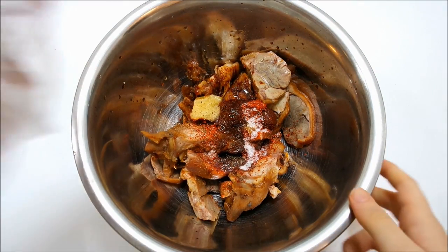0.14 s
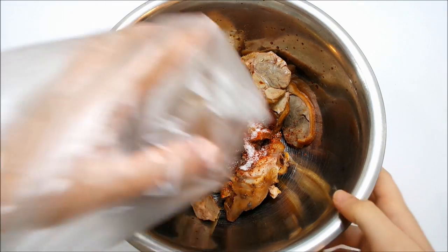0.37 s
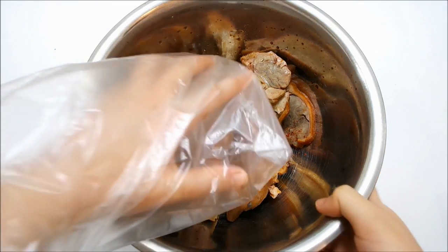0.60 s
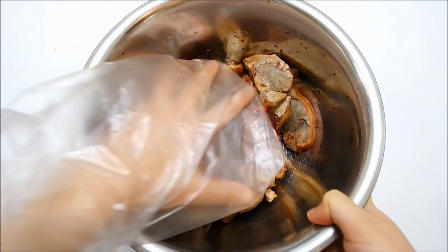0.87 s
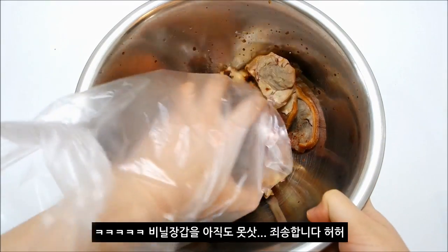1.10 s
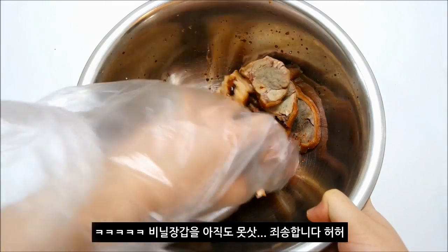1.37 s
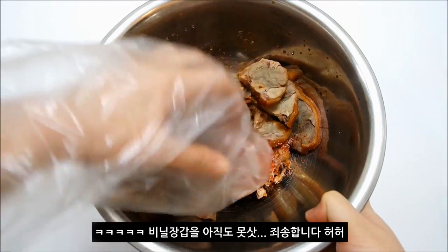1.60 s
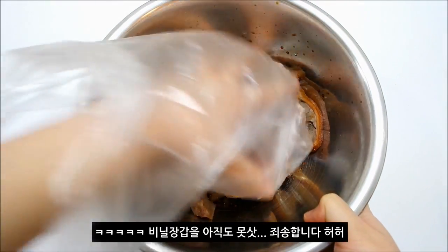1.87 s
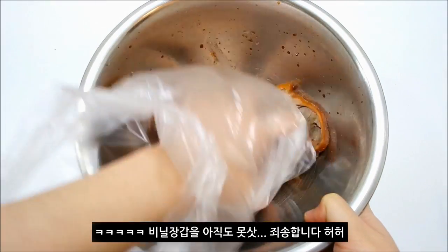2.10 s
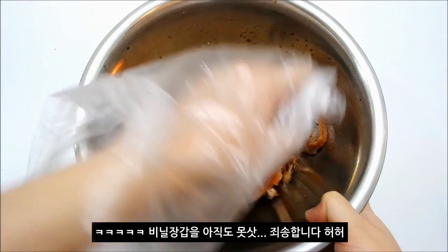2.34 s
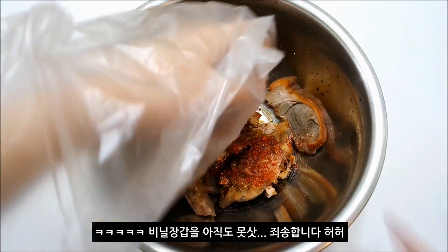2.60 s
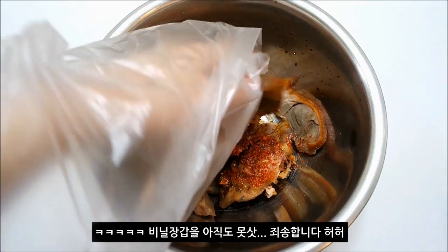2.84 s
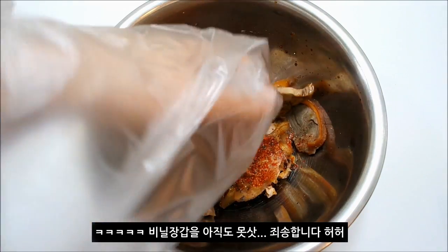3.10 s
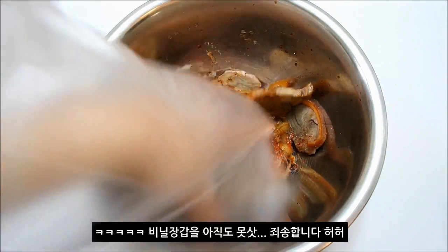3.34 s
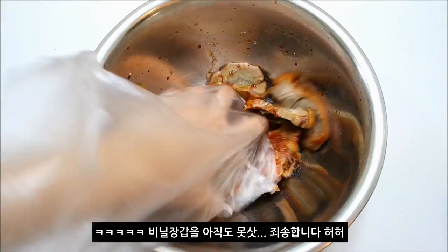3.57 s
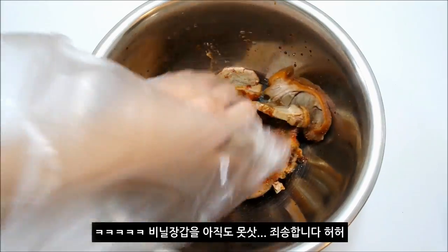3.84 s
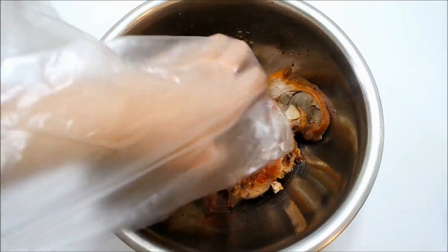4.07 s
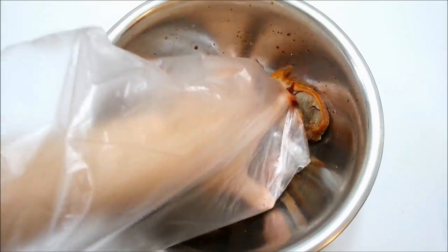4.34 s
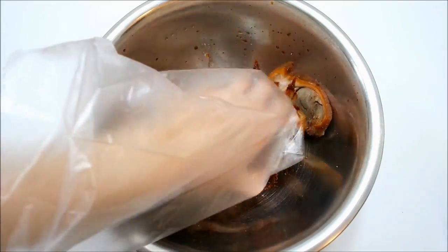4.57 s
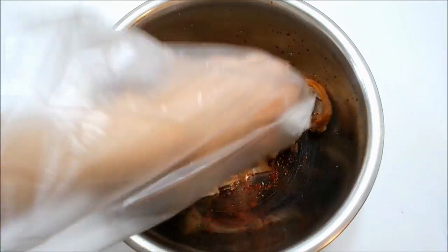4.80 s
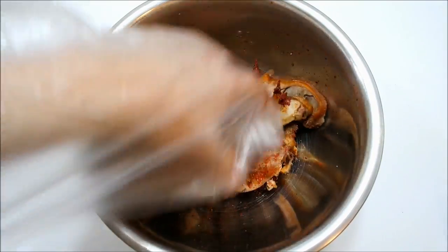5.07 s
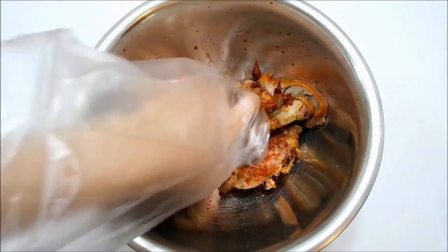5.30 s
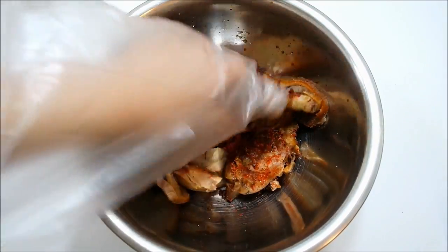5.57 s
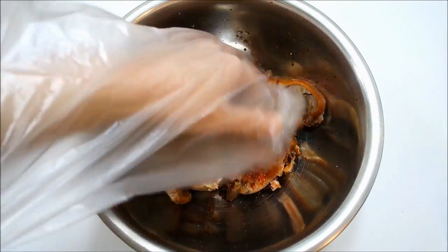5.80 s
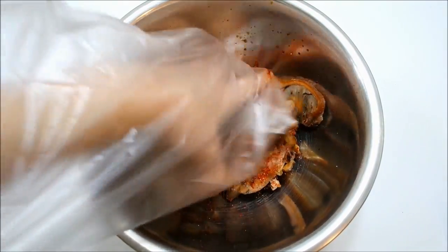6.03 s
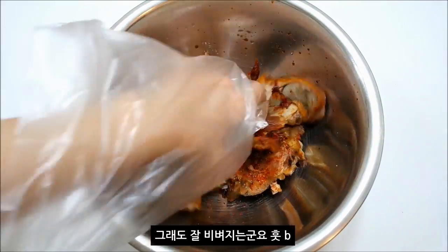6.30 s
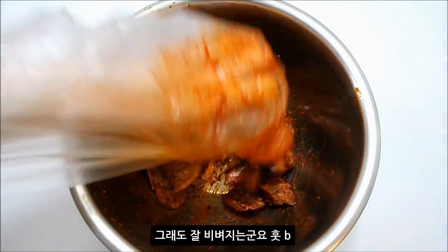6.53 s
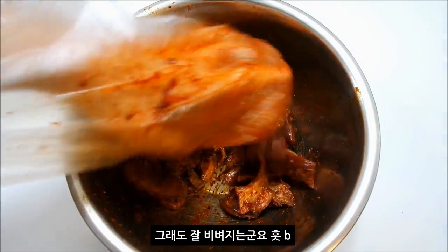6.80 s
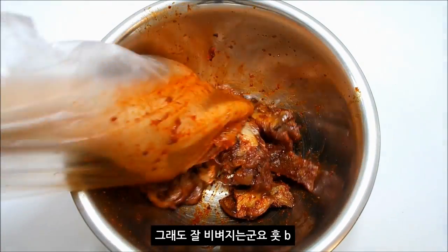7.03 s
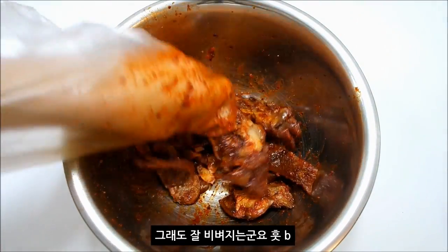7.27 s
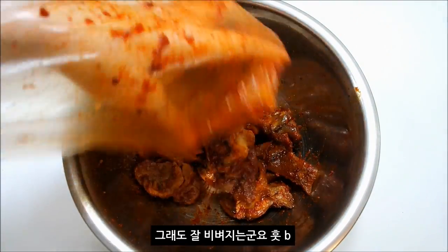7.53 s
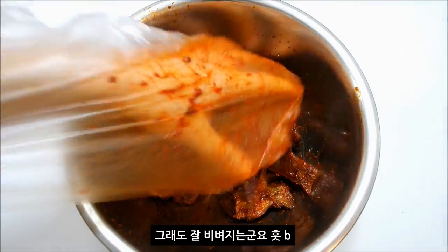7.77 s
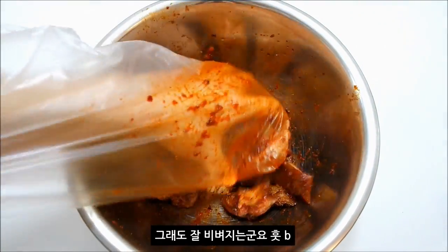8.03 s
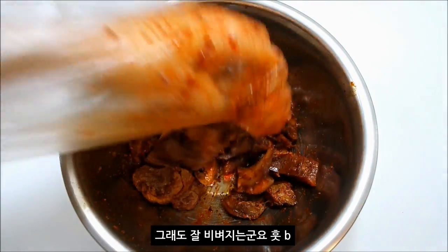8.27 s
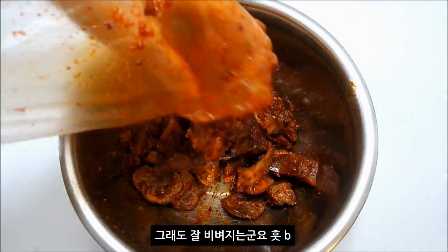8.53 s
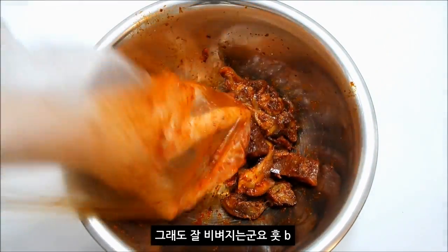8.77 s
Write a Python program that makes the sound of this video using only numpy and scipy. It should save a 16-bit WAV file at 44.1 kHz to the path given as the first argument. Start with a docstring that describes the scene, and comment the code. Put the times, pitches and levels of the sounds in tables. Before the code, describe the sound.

A hand in a loose plastic bag works seasoned meat in a metal bowl, heard very near in a dry room. After a short silent opening, bright crinkling grows quickly, surging with each squeeze and peppered with crisp snaps. Dull, damped bowl knocks begin around two seconds; later the rustle eases into softer strokes, with a hollow thump late and a final rustle.

```python
"""Kitchen, close under a two-port microphone: a hand in a loose plastic bag kneads meat in a steel bowl.
After a short silence the building's faint rumble and a low murmur of pressing, both shaped noise, fade in.
The film crinkles from the start: thousands of tiny random clicks over sliding noise, which rise and fall
in short swells and are coloured by the bowl's hollow. Large creases soon snap as spiky noise bursts.
From the second second on the bowl also knocks on the counter: short pushes ring its damped modes."""
import sys
import numpy as np
from scipy import signal
from scipy.fft import rfft, irfft, next_fast_len
from scipy.io import wavfile
from scipy.ndimage import uniform_filter1d

SR = 44100
rng = np.random.default_rng(int(sys.argv[2]) if len(sys.argv) > 2 else 0)


def amp(db):
    return 10 ** (np.asarray(db, float) / 20)


def store_pcm(level_fs):
    """Save levels as 16-bit WAV."""
    pcm = np.round(np.clip(level_fs, -1, 1) * 32767).astype(np.int16)
    wavfile.write(sys.argv[1], SR, np.atleast_2d(pcm).T)


N = 392049
SIZE = next_fast_len(N + 8192, True)  # transform length, with room for filter tails
HZ = np.arange(SIZE // 2 + 1) * SR / SIZE
TIME = np.arange(N) / SR
PORT_LAG_US, LAG_SPREAD_US = 21, 9  # how much later the left port hears the bag, and its scatter


def unit(x):
    """Scale to rms 1."""
    return x / np.sqrt(np.mean(x ** 2))


def shape(points):
    """Gain at every frequency from (Hz, dB) points, joined along log frequency."""
    hz, db = np.transpose(points)
    return amp(np.interp(np.log(HZ + 1), np.log(hz), db))


def through(x, response):
    """Filter by a frequency response."""
    return irfft(rfft(x, SIZE) * response, SIZE)[..., :N]


def resonance(hz, width_hz):
    """A damped resonator, gain 1 at its centre."""
    return 1j * HZ * width_hz / (hz ** 2 - HZ ** 2 + 1j * HZ * width_hz)


def walk(rate):
    """Random levels held for 1 / rate seconds and slewed twice; spread 1."""
    hold = max(int(SR / rate), N // 4000)
    levels = rng.standard_normal(4096)[:N // hold + 1]
    steps = np.repeat(levels, hold)[:N]
    return unit(uniform_filter1d(uniform_filter1d(steps, hold), hold))


def ports(x, lag_us):
    """Mid and side of a sound that reaches the left port lag_us later than the right."""
    half = np.pi * HZ * lag_us / 1e6
    return through(x, np.array([np.cos(half), -1j * np.sin(half)]))


# Colour of the rumble of the building. Each row: frequency in Hz, relative density in dB per Hz.
RUMBLE_COLOUR = [(12, -33), (24, -7), (33, -2.5), (42, -5), (60, -25), (90, -29.5)]


def kitchen():
    """Deep rumble of the building: shaped noise whose level wanders slowly."""
    rumble = unit(through(rng.standard_normal(N), shape(RUMBLE_COLOUR)))
    return amp(-60.5 + 0.64 * walk(3.35)) * rumble


# Weight shifting through bowl and counter. Each row: time in seconds, level in dB against the crinkle.
PRESS = [(.8, -16), (1.1, -22), (1.9, -19), (2.5, -18.5), (3.0, -14), (3.55, -15.5), (3.95, -15),
         (4.2, -16.5), (4.5, -19), (5.3, -16), (6.33, -16), (6.7, -15.5), (7.3, -14), (8.89, -12.5)]
# Colour of the murmur in the bowl. Each row: frequency in Hz, relative density in dB per Hz.
MURMUR_COLOUR = [(29, -28), (50, -12), (59, -2.5), (97, 0.5), (232, -2), (294, -1.5), (356, 0.5), (495, 0),
                 (569, 0.5), (613, -11), (640, 3.5), (830, -33), (1410, -120)]


def pressing(level_db):
    """Low, lumpy murmur of meat and hand pressing on the bowl: noise nearly the same at both ports."""
    smooth_s, side_db = .08, -30
    followed_db = uniform_filter1d(level_db, int(smooth_s * SR))
    db = followed_db + np.interp(TIME, *np.transpose(PRESS))
    lumps = amp(0.5 * walk(18) + 2.94 * walk(45)) * rng.standard_normal((2, N))
    murmur = unit(through(lumps, shape(MURMUR_COLOUR)))
    return amp(db + np.array([[0], [side_db]])) * murmur


# The bowl bumping the counter. Each row: start in seconds, peak in dB before the bass cut, contact in ms,
# favoured pitch in Hz, t60 in seconds that the grip alone allows.
KNOCKS = [(1.751, -26, 2.6, 350, 0.57), (1.781, -23.5, 2.7, 355, 0.23), (1.82, -37.5, 2.8, 371, .6),
          (2.4963, -35, 1.4, 230, .12), (2.868, -35, 2, 96.9, .4), (2.8798, -35, 1.8, 200, 0.28),
          (2.955, -42, 2.4, 104, .5), (3.0835, -39, 1.7, 110, .4), (3.094, -31, 1.5, 250, 0.51),
          (3.468, -38, 1.5, 72.7, 0.31), (3.529, -28.5, 2.5, 353, 0.23), (3.664, -37, 1.2, 143, .4),
          (3.746, -35, 3, 218, .6), (5.321, -43, 1.5, 94.2, .5), (5.922, -39, 3.5, 107, 0.23),
          (6.204, -39, 4.5, 108, .3), (6.667, -35, 0.73, 380, .5), (7.2752, -42, 2.4, 108, 0.22),
          (7.287, -36, 2.4, 130, 0.18), (7.3707, -35.5, 2, 358, 0.22), (7.594, -40, 3.2, 116, .3),
          (7.606, -40, 3.3, 110, .2), (7.959, -34, 2.3, 91.5, 0.21), (7.977, -33, 2.1, 330, .25),
          (8.172, -42, 2.4, 75.4, .4), (8.307, -17, 1, 300, 0.13), (8.327, -30.5, 2.1, 230, 4.5),
          (8.346, -36, 2.3, 164, .3)]
# Modes of bowl and counter. Each row: frequency in Hz, level in dB before the place of the blow counts,
# t60 in seconds before the grip.
BOWL_MODES = [(101, -1, .3), (160.2, -8, 0.59), (199, 0.5, 0.081), (259, -8, 2.3), (345, -1.5, 0.16),
              (365.4, 1, 0.34), (416, -15, 0.21), (473, -2, 0.37), (562, 0, 0.56), (694, 15.5, 0.035),
              (980, -17, .1)]


def knocks():
    """A soft push of a few ms thumps the counter and rings the bowl's modes; hand and meat damp them."""
    length = SR // 2  # samples a knock may last
    contact = 441  # samples that hold the push
    rattle_db, tap_db = -8, -18  # shudder in the ring; the contact's own click against the peak
    out, t = np.zeros(N + length), np.arange(length) / SR
    hz, db, t60 = np.transpose(BOWL_MODES)[:, :, None]
    rings = np.sin(2 * np.pi * hz * t) * np.exp(-np.log(1000) * t / t60)
    shudder = rng.standard_normal((len(KNOCKS), length)) * np.exp(-t / 0.05)
    for (s, peak_db, ms, spot_hz, grip_t60), rattle in zip(KNOCKS, shudder):
        push = np.sin(np.pi * np.clip(t[:contact] * 1000 / ms, 0, 1)) ** 2
        grip = np.exp(-np.log(1000) * t / grip_t60)
        # where the blow lands favours the modes near one pitch
        share = amp(db - 4.9 * np.abs(np.log2(hz / spot_hz)))[:, 0]
        # the base shudders on the counter as it settles
        b, a = signal.iirpeak(max(spot_hz, 200), .8, SR)
        rattle = signal.lfilter(b, a, rattle)
        ring = share @ rings * grip / share.sum() + amp(rattle_db) * rattle
        ring = signal.fftconvolve(ring, push)[:length]
        blow = -ring / np.abs(ring).max()
        click = np.gradient(push)
        blow[:contact] += amp(tap_db) * click / np.abs(click).max()
        out[int(s * SR):][:length] += amp(peak_db) * blow
    # a small counter radiates no deep bass
    return through(out[:N], (HZ / (HZ - 75j)) ** 2)


# Single large creases snapping. Each row: start in seconds, peak in dB before the bass cut, pitch in Hz.
SNAPS = [(0.761, -31, 7730), (0.821, -18, 4640), (0.947, -25, 7590), (1.061, -16, 3760), (1.492, -24, 6190),
         (2.0104, -25, 4010), (2.154, -15, 4830), (2.25, -13, 3450), (2.2864, -30, 4630),
         (2.3955, -10, 10000), (2.4153, -15, 7420), (2.5183, -27, 5710), (2.6858, -19, 10300),
         (2.8883, -20.5, 10900), (3.103, -20, 8650), (3.2784, -20, 4260), (3.6604, -14.5, 8150),
         (4.6964, -9, 5200), (4.6998, -15, 9000), (4.7567, -15, 3250), (4.7678, -15, 6960),
         (4.8125, -14, 3730), (4.8344, -16, 4470), (5.0375, -25, 6170), (5.369, -25, 5240),
         (5.5745, -19, 10300), (5.665, -18.5, 4560), (5.894, -20, 5500), (6.042, -17, 7720),
         (6.551, -17, 8050), (7.2744, -25, 4580), (8.8688, -31, 4700)]


def snaps():
    """Each large crease tears along in a short, spiky burst: broad, with a pitched edge."""
    length, swell_ms = 1024, 0.44  # samples; time for the envelope to peak
    out, t = np.zeros(N + length), np.arange(length) / SR
    chance = rng.standard_normal((len(SNAPS), 2, length))
    for (s, db, hz), (noise, spikes) in zip(SNAPS, chance):
        run = t * 1000 / swell_ms
        burst = noise * amp(3.0 * spikes) * run * np.exp(-run)
        b, a = signal.iirpeak(hz, 1.5, SR)
        burst = signal.lfilter(b, a, burst) + 0.62 * burst
        out[int(s * SR):][:length] += amp(db) * burst / np.abs(burst).max()
    thin = through(out[:N], (HZ / (HZ - 600j)) ** 2)
    return ports(thin, PORT_LAG_US)


# The hand's steady work in the bag. Each row: time in seconds, crinkle level in dB.
EFFORT = [(.66, -73), (.736, -74), (.764, -57.5), (.79, -52), (.82, -44), (.9, -45), (1.211, -39),
          (1.388, -43), (1.574, -43.5), (1.732, -37.5), (1.938, -46.5), (2.312, -37.5), (2.431, -36.5),
          (2.463, -47.5), (2.87, -44.5), (3.048, -48), (3.302, -44), (3.324, -38.5), (3.762, -35),
          (3.926, -39), (4.388, -37), (4.49, -39), (4.588, -40.5), (4.848, -42.5), (5.008, -46.5),
          (5.162, -36.5), (5.24, -39.5), (5.462, -43), (5.632, -44), (5.761, -38), (6.025, -42.5),
          (6.045, -38.5), (6.138, -37), (6.351, -40.5), (6.614, -45), (6.812, -39.5), (7.218, -44),
          (7.488, -50.5), (7.6, -41.5), (7.74, -43), (8.102, -50.5), (8.401, -51), (8.448, -44),
          (8.738, -50), (8.89, -37)]
# How much of the steady rustle rings in the hollow. Each row: time in seconds, share in dB.
IN_HOLLOW = [(.7, -8), (1.0, -7.5), (1.3, -10), (1.64, -9.5), (1.71, -7.5), (1.8, -8.5), (1.88, -7),
             (2.45, -10), (3.1, -6.5), (3.3, -10), (3.75, -6.5), (4.1, -11.5), (4.5, -8), (5.0, -11.5),
             (6.0, -9), (6.2, -8.5), (6.8, -9), (8.1, -7), (8.45, -10.5), (8.89, -3)]
# Short swells of crinkle: squeezes, one snap's rustling body, and the crackle with the hardest knock.
# Each row: time of the peak in seconds, peak in dB, length in ms (between the points at 1/e of the power),
# share ringing in the hollow in dB.
SWELLS = [(.974, -39.5, 75, -9), (1.067, -36, 57, -8.5), (1.329, -37.5, 59, -17), (1.503, -33, 40, -10.5),
          (2.036, -37.5, 100, -9), (2.229, -37, 51, -13), (2.41, -30.5, 28, -18), (2.563, -42.5, 73, -12),
          (2.693, -40.5, 43, -11.5), (3.46, -30, 86, -12.5), (4.027, -36.5, 42, -9),
          (4.232, -34.5, 53, -11.5), (4.699, -32, 8, -8), (4.818, -35, 33, -15), (4.933, -37, 40, -8.5),
          (5.346, -38.5, 137, -6.5), (5.547, -40, 117, -7), (5.82, -37, 40, -25), (5.904, -40.5, 140, -19),
          (6.414, -40, 110, -17), (6.57, -42, 28, -3.5), (6.715, -41, 85, -12), (7.07, -40.5, 73, -4),
          (7.297, -45, 32, -2), (7.4, -45, 105, -4.5), (7.822, -41, 52, -12), (7.942, -43, 210, -4),
          (8.193, -43.5, 126, -6), (8.299, -38.5, 62, -9), (8.52, -45.5, 59, -6), (8.65, -45, 103, -9.5),
          (8.865, -36.5, 16, -7)]


def hand():
    """Level (dB) of the crinkle and of its part in the hollow: steady work plus swells, summed as power."""
    t = TIME[::64]
    steady_db = np.interp(t, *np.transpose(EFFORT))
    steady_hollow_db = steady_db + np.interp(t, *np.transpose(IN_HOLLOW))
    s, db, ms, hollow_db = np.transpose(SWELLS)[:, :, None]
    # doubled dB turn amp() into a power
    swells = amp(2 * db) * np.exp(-((t - s) * 2000 / ms) ** 2)
    whole = amp(2 * steady_db) + swells.sum(axis=0)
    hollow = amp(2 * steady_hollow_db) + (amp(2 * hollow_db) * swells).sum(axis=0)
    return [np.interp(TIME, t, 10 * np.log10(power)) for power in (whole, hollow)]


def buckling(scatter_db, tick_db, rip_ms):
    """Creases give way at random, most tiny and a few much larger, over film sliding; six patches."""
    clicks = 24000
    slide_db = 2  # hiss of film sliding, against the ripping creases
    when, size, sign, patch = rng.random((clicks, 4)).T
    sizes_db = np.minimum(-scatter_db * np.log(size + 1e-9), 16)
    sizes = amp(sizes_db) * np.sign(sign - .5)
    pitches = 1400 * 2 ** np.arange(0, 3.6, .7)  # Hz
    places = [-1.5, .9, -.3, 1.5, -.9, .3]  # direction of each patch, in lag spreads
    keep = np.exp(-1000 / (rip_ms * SR))
    out = 0
    for k, hz in enumerate(pitches):
        own = (patch * len(pitches)).astype(int) == k
        train = np.bincount((when[own] * N).astype(int), sizes[own], N)
        # each crease ticks, then rips on for a moment; the sliding never stops
        rip_power = signal.lfilter([1], [1, -keep], train ** 2)
        strength = np.sqrt(rip_power / rip_power.mean() + amp(slide_db) ** 2)
        rip = strength * rng.standard_normal(N)
        # a patch rings briefly at its own pitch, in flurries of its own
        ringing = through(amp(tick_db) * unit(train) + rip, .35 + resonance(hz, .7 * hz))
        sound = amp((1.3 + 0.21 * k) * walk(33)) * ringing
        out = out + ports(unit(sound), PORT_LAG_US + LAG_SPREAD_US * places[k])
    return out


# Colour of the film close by. Each row: frequency in Hz, relative density in dB per Hz.
FILM_COLOUR = [(350, -37.5), (600, -11.5), (754, -5.5), (961, -3), (1130, -6), (1910, -3), (4520, 2),
               (8870, 1), (11900, 4), (14400, 1.5), (15000, -5.5)]
# Resonances of the bowl's hollow. Each row: frequency in Hz, width in Hz, gain in dB.
HOLLOW = [(713, 370, -3), (1154, 320, -6.5)]


def bag(level_db, hollow_db):
    """The film's crackle and slide, played by the hand; the bowl's hollow returns the deep part."""
    # harder work sounds duller, and the treble flickers
    usual_db, bright_db_per_db = -37.5, -.15
    harder_db = np.maximum(level_db, -50) - usual_db
    bright_db = -0.4 + bright_db_per_db * harder_db + 0.84 * walk(10)
    film = buckling(scatter_db=1.5, tick_db=-3, rip_ms=0.71)
    film = amp(0.11 * walk(30) + 0.88 * walk(80)) * film
    # flatten the creases' own colour, then give the whole the colour of the film
    power = uniform_filter1d(np.abs(rfft(film[0], SIZE)) ** 2, 4001)
    film = through(film, shape(FILM_COLOUR) / np.sqrt(power))
    top = 1 / (1 + (9000 / (HZ + 1)) ** 8)
    deep = 1 / (1 + (HZ / 1900) ** 4)
    echo = sum(amp(db) * resonance(hz, width_hz) ** 2 for hz, width_hz, db in HOLLOW)
    hollow = unit(through(film, deep * (1 + echo)))
    middle = unit(through(film, 1 - top - deep))
    treble = unit(through(film, top))
    mix = amp(level_db) * (middle + amp(bright_db) * treble) + amp(hollow_db) * hollow
    return mix * (TIME > EFFORT[0][0])


# How much of the difference between the ports is kept. Each row: frequency in Hz, gain in dB.
WIDTH = [(100, -3), (300, 4), (1000, -1), (2000, -1), (3200, -1), (4800, -4.5), (5600, -1.5), (14000, 0.9)]


def scene():
    """Bag, snaps and knocks, with murmur and rumble faded in, at the left and right port."""
    fade = np.clip((TIME - .66) / 0.15, 0, 1) ** 0.84
    level_db, hollow_db = hand()
    mid, side = bag(level_db, hollow_db) + snaps() + fade * pressing(level_db)
    mid = mid + knocks() + fade * kitchen()
    side = through(side, shape(WIDTH))
    return np.array([mid + side, mid - side])


def roll_off(x):
    """The treble ends steeply here."""
    return signal.sosfilt(signal.butter(12, 16030, fs=SR, output="sos"), x)


def record(dry):
    """The recorder starts after a silence and cuts the top steeply."""
    top_hz, start_s = 15150, .645
    mix = through(dry, HZ < top_hz) * (TIME > start_s)
    return roll_off(mix)


dry = scene()
out = record(dry)
store_pcm(out)
```